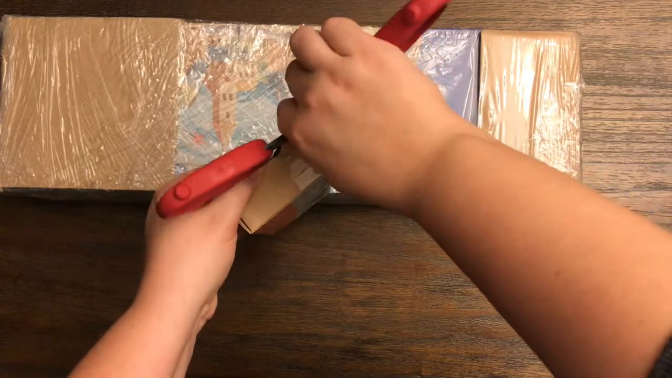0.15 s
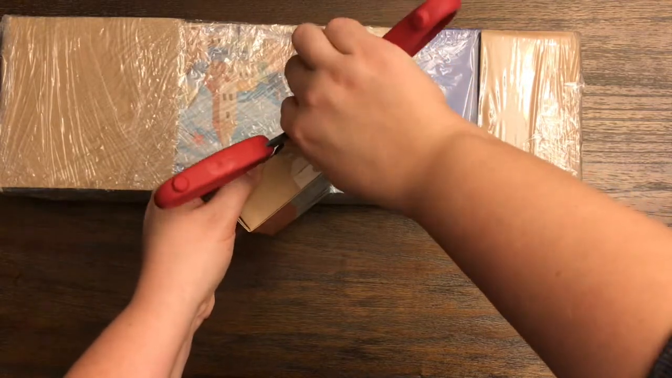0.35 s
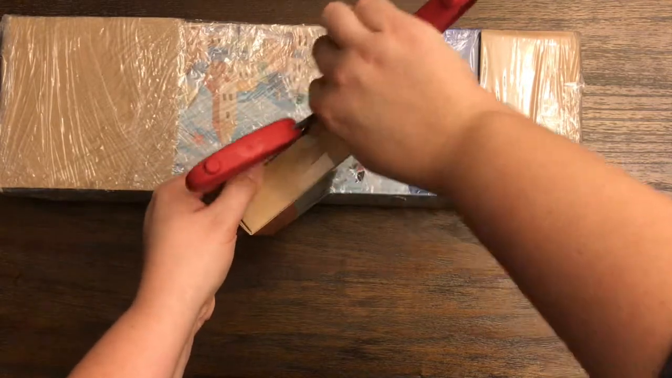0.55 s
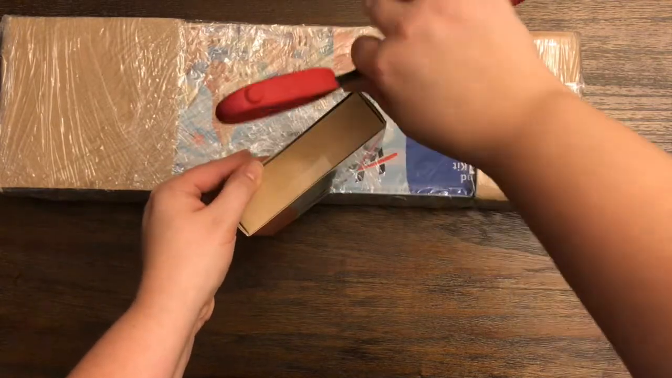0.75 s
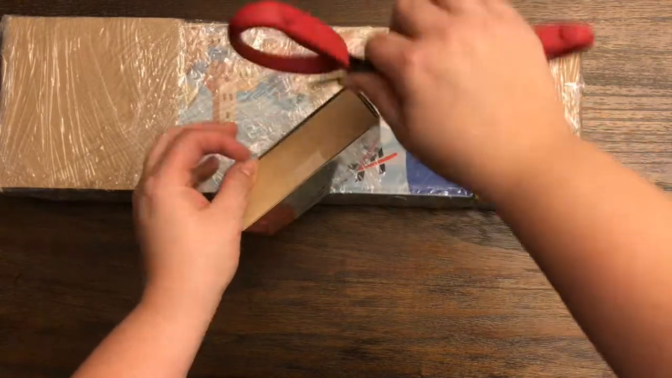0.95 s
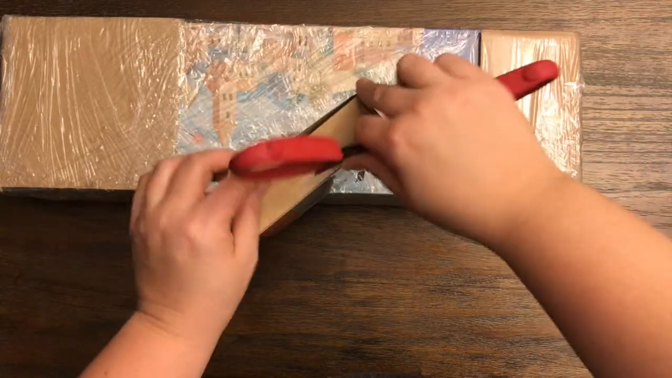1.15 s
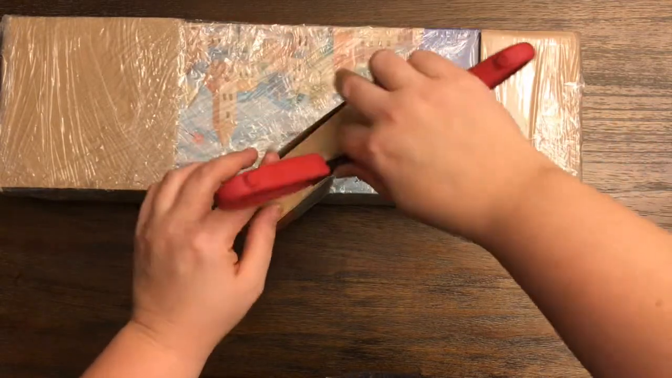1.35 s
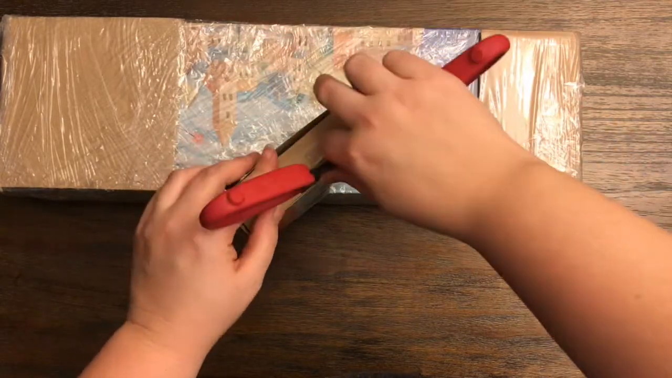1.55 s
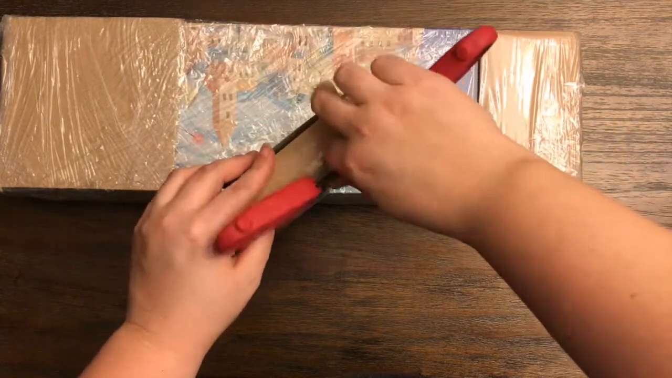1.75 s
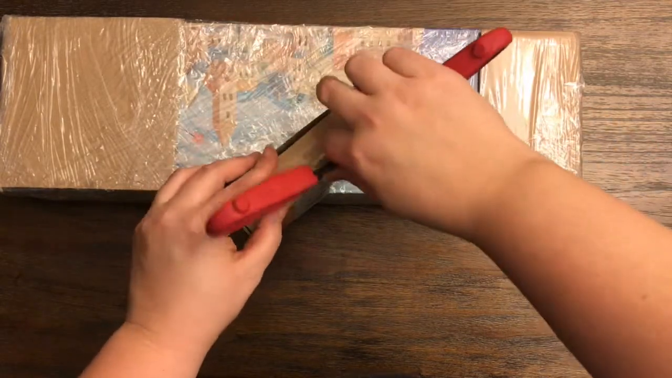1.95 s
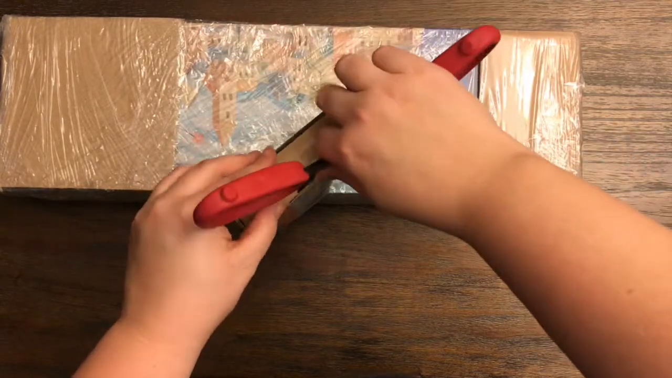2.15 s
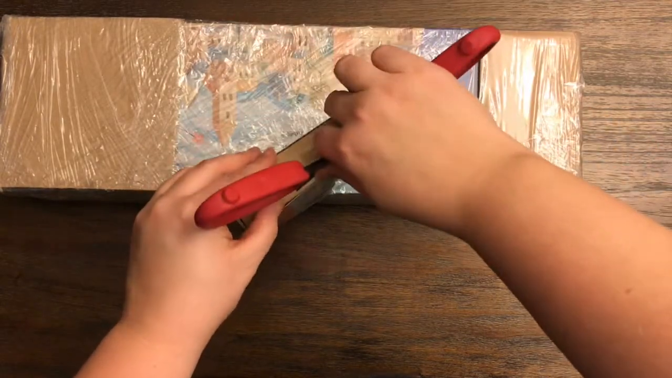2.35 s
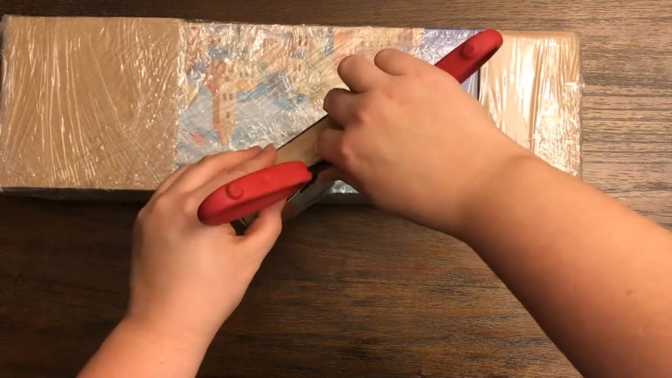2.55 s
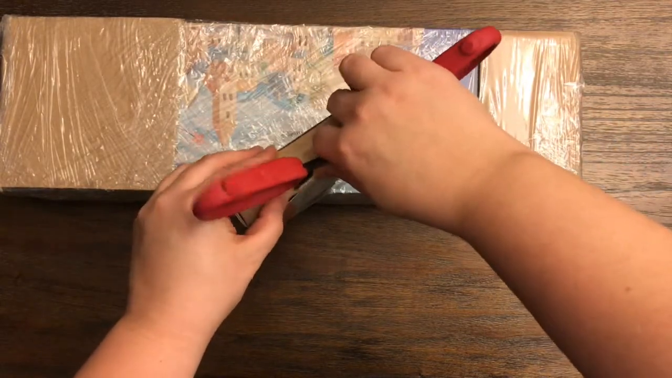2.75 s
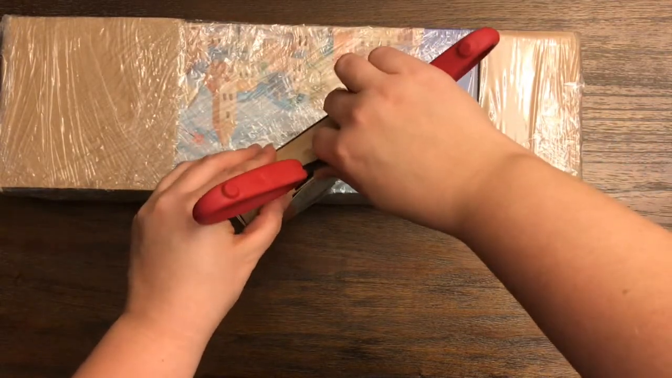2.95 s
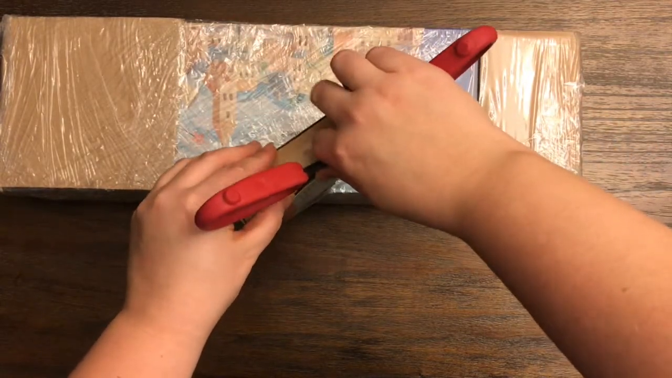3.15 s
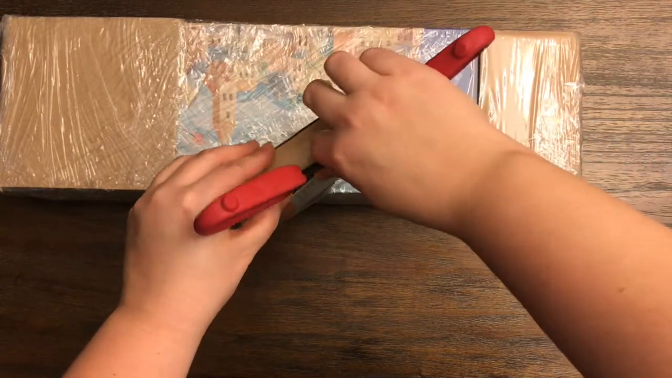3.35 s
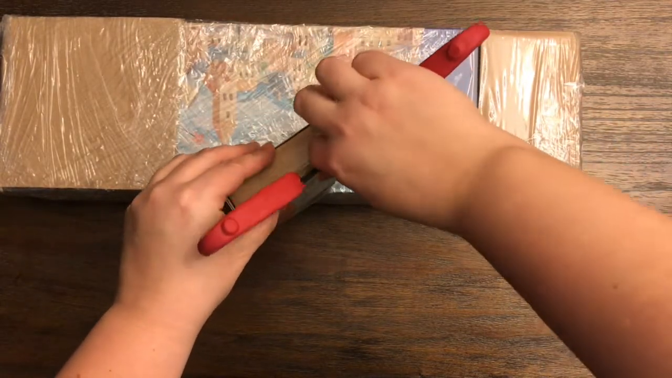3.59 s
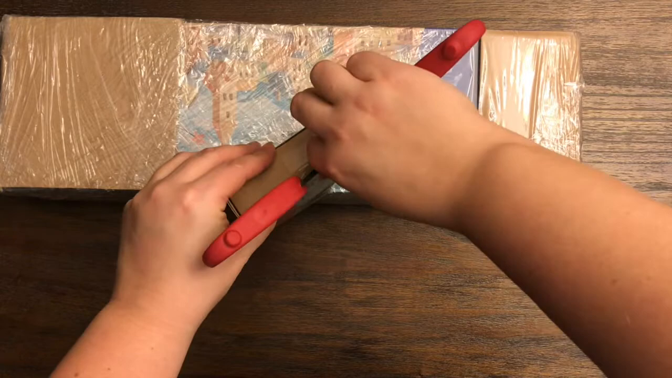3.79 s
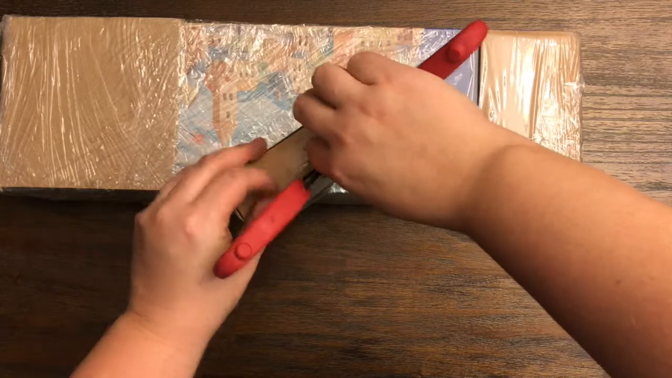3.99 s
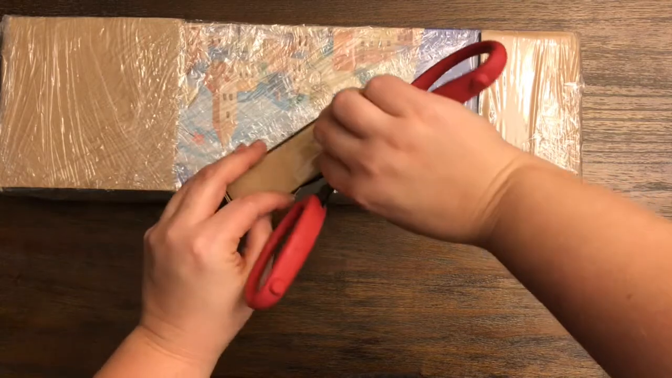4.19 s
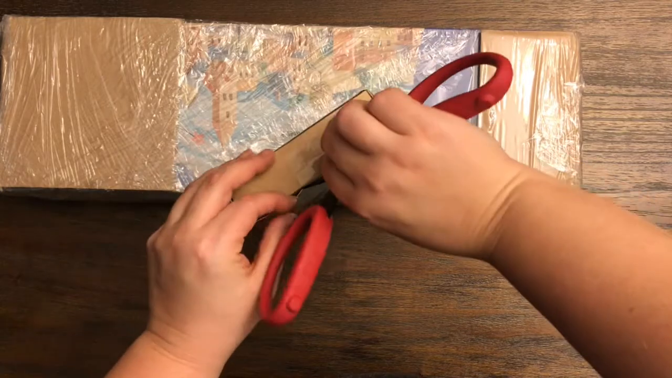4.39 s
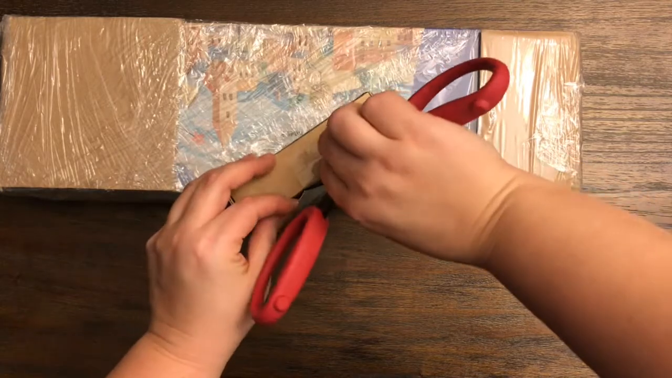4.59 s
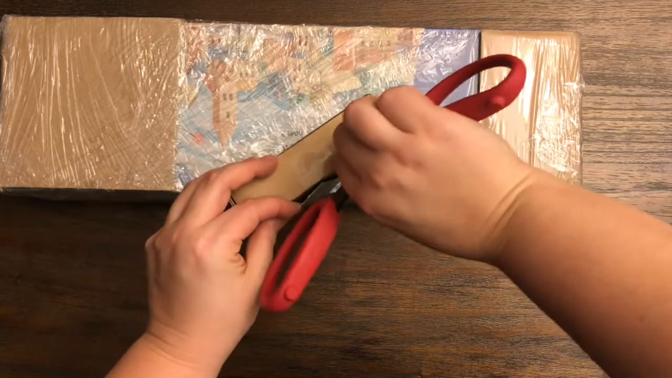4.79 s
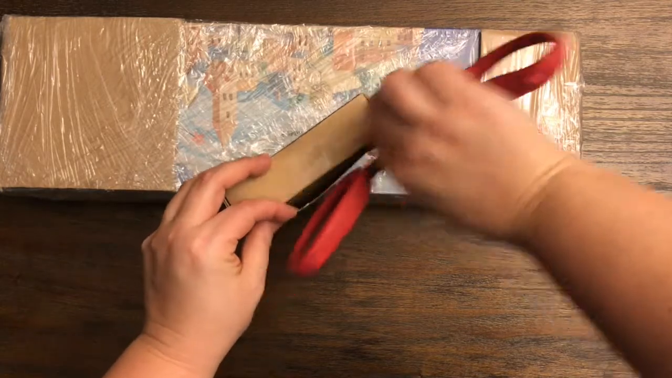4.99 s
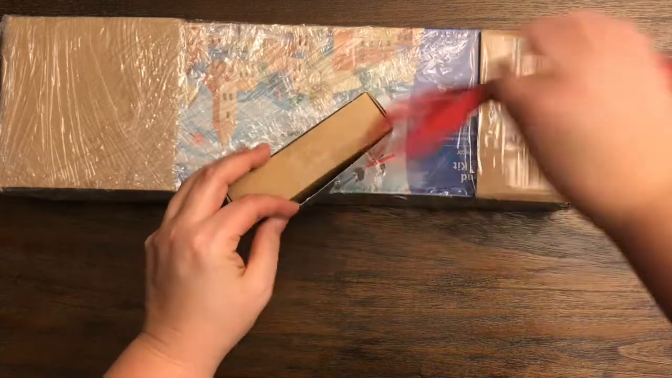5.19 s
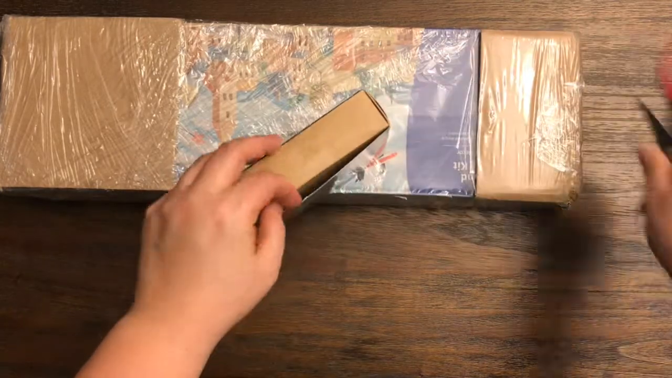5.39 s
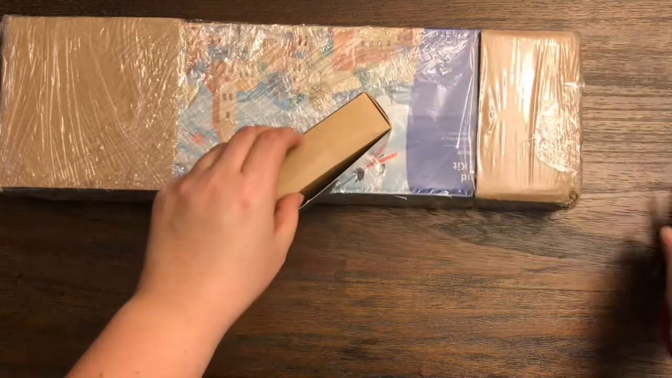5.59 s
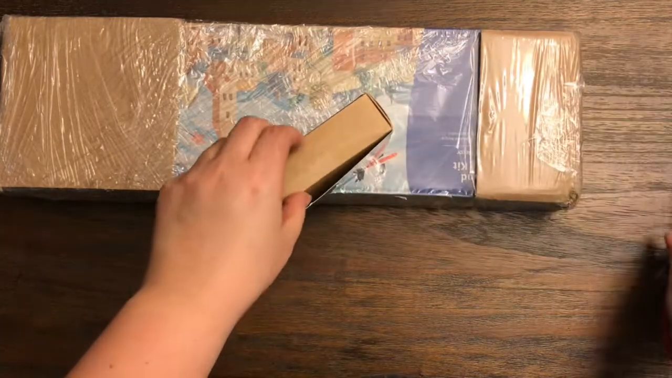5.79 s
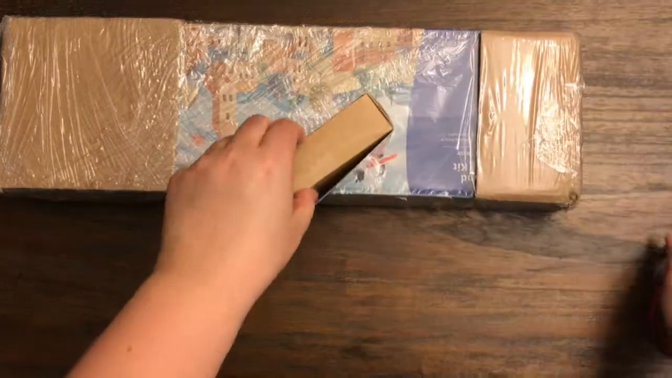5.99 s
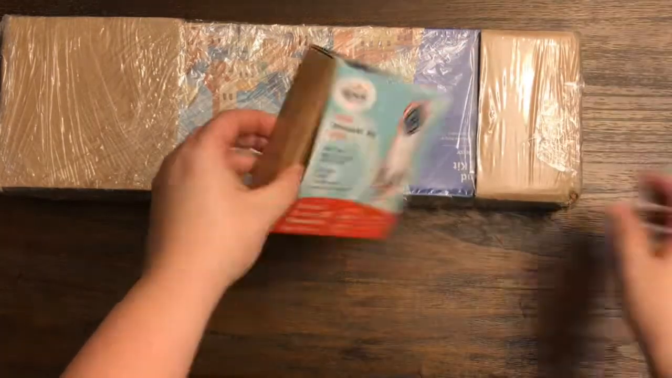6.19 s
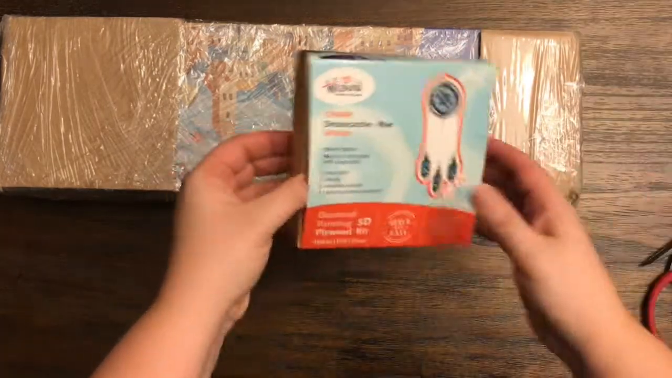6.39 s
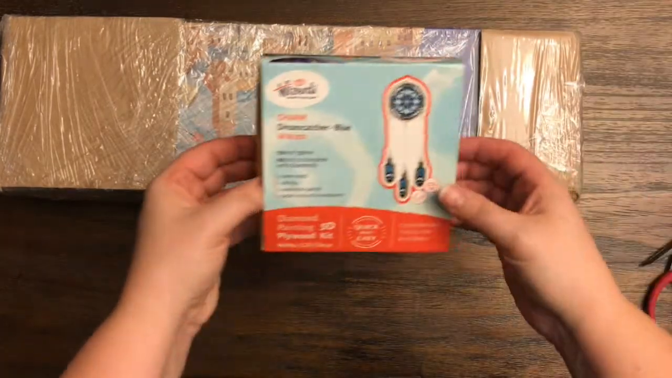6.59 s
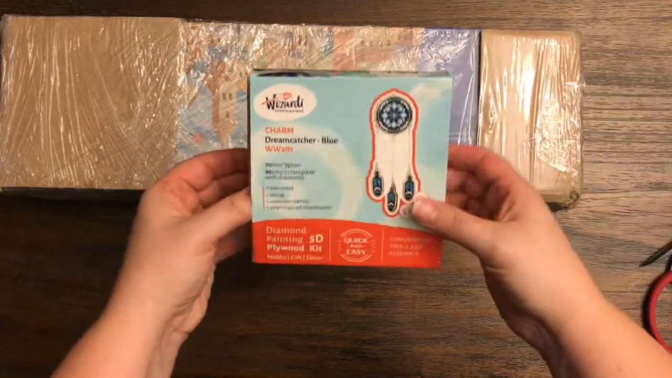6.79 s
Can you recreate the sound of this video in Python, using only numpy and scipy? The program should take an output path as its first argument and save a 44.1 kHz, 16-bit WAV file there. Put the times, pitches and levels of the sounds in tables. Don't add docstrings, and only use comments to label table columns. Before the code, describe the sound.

Scissors poke and slice tape on a small hollow cardboard box, with two sharp snaps, faint ticks, then a scraping, crinkling lift in a quiet room.

```python
import sys
import numpy as np
from scipy import signal
from scipy.fft import rfft, irfft, next_fast_len
from scipy.io import wavfile
from scipy.ndimage import uniform_filter1d

SR = 44100
rng = np.random.default_rng(int(sys.argv[2]) if len(sys.argv) > 2 else 0)


def master(y):
    cut = np.clip(np.atleast_2d(y).T, -1, 1)
    pcm = np.round(cut * 32767)
    wavfile.write(sys.argv[1], SR, pcm.astype(np.int16))


def attenuation_scalar(level_db):
    decades = np.asarray(level_db, float) / 20
    return 10 ** decades


N = 301672

# f/Hz, density [dB per Hz]
ROOM_AIR = [(25, -100), (45, -90), (110, -85), (170, -87), (300, -91), (400, -91), (500, -100),
            (800, -102.5), (1100, -105), (1600, -106), (2100, -110), (3200, -112.5), (5000, -115.5),
            (10500, -120), (15500, -120)]
# multiple of the hum pitch, level/dB rms
HUM_OVERTONES = [(1, -61.5), (2, -67), (3, -78)]
# t/s, crack peak level/dB, crack centre f/Hz
POPS = [(.045, -60, 7000), (0.081, -53, 6560), (.166, -48, 9100), (0.1884, -52, 9000), (0.359, -56.5, 6560),
        (.468, -14.5, 10300), (1.0083, -44, 13400), (1.023, -39, 8520), (1.039, -33, 9000),
        (2.3605, -38, 9000), (2.3663, -32.5, 8600), (2.3731, -30.5, 7000), (2.755, -50, 13800),
        (2.822, -42, 8450), (3.0552, -49.5, 6850), (4.136, -57, 11000), (4.0135, -43, 7500),
        (4.2174, -48, 9000), (4.9879, -16, 12500), (5.4155, -39, 7340), (6.769, -43.5, 5660)]
# t/s, crack peak level/dB
TICKS = [(0.7863, -42), (0.8766, -52), (0.9875, -44.5), (1.0617, -53), (1.29, -41.5), (1.7926, -49),
         (1.842, -47), (1.991, -62), (2.111, -59), (2.24, -55), (2.5305, -59), (2.5365, -53.5),
         (2.624, -45), (2.7177, -60), (3.1052, -51), (3.541, -56), (3.657, -57), (4.0461, -43),
         (4.072, -56), (4.1883, -46), (4.763, -48), (4.875, -52), (5.0404, -34), (5.2236, -50),
         (5.8444, -57), (6.2872, -66), (6.418, -56), (6.596, -54)]
# t/s, crack peak level/dB, box low level/dB, box mid level/dB, panel f/Hz
SNAPS = [(0.4601, -45, -52, -48, 203), (0.4645, -22.5, -34, -30.5, 160), (.468, -35, -54, -23, 294),
         (0.4694, -17, -29, -32, 178.6), (0.5071, -38, -34.5, -45, 186), (0.6844, -26, -29.5, -31.5, 560),
         (0.6914, -24, -30, -65, 820), (4.961, -43.5, -54, -65, 171), (4.9893, -22.5, -32.5, -24.5, 517),
         (5.005, -35, -52, -56, 374), (5.02, -22, -22.5, -27.5, 704), (5.697, -56, -42, -39, 221),
         (5.7057, -50, -42, -52, 206), (5.92, -26.5, -32, -32.5, 200), (5.9938, -48, -43, -26, 799),
         (6.0161, -36, -23.5, -21.5, 805), (.476, -60, -30.5, -65, 181), (0.489, -48, -42.5, -64, 165),
         (4.761, -72, -46, -73, 212), (4.994, -63, -32, -52, 225)]
# t/s, crack peak level/dB, box low level/dB, box mid level/dB, panel f/Hz
KNOCKS = [(1.4604, -59, -56, -50, 336), (1.7255, -35, -47, -49.5, 795), (1.7273, -39.5, -50, -55, 800),
          (1.7788, -60, -43, -45, 171), (2.226, -40, -41, -55, 550), (2.575, -38, -40.5, -46.5, 310),
          (2.646, -49, -64, -49, 285), (2.651, -60, -58, -49, 358), (2.821, -63, -48, -71, 183),
          (2.9504, -55.5, -49, -71, 160), (3.0564, -60, -46, -54, 410), (3.204, -49, -34, -64, 296),
          (3.3905, -57.5, -86, -55, 187), (3.4382, -49.5, -52, -49, 474), (3.46, -48, -46, -57, 550),
          (3.8717, -45, -52, -40.5, 291), (4.2177, -60, -48, -49, 477), (4.2709, -62, -48.5, -49.5, 353),
          (4.33, -47.5, -46.5, -49, 333), (4.7902, -65, -43.5, -49, 295), (5.4276, -42.5, -61, -55, 404),
          (6.4506, -42.5, -41, -77, 710), (6.6504, -53.5, -59, -51, 337), (6.772, -63, -49.5, -48, 625),
          (6.7985, -50, -56, -42.5, 330)]
# t/s, crack peak level/dB, crack centre f/Hz, box level/dB
CRINKLES = [(5.9306, -47, 6010, -38.5), (5.9402, -34, 5400, -36), (5.9538, -36, 5960, -38),
            (5.999, -32.5, 6000, -33), (6.02, -48, 6700, -50), (6.027, -26.5, 6450, -22),
            (6.0354, -43, 5800, -33), (6.063, -44, 8000, -39), (6.071, -41, 6410, -40),
            (6.084, -39, 9000, -40), (6.089, -25.5, 11600, -32), (6.0984, -44, 4200, -49),
            (6.1048, -37, 9000, -40), (6.1183, -44, 11000, -41), (6.131, -39, 5000, -32.5),
            (6.1347, -34, 12800, -41), (6.1675, -59, 6170, -42), (6.2017, -52, 4500, -32.5)]
# f/Hz, width f/Hz, level/dB
BOX_LOW = [(134, 32, -6), (216, 35, -7), (291, 56, -3), (436, 60, -8), (553, 80, -13), (715, 110, -18)]
# f/Hz, width f/Hz, level/dB
BOX_MID = [(847, 170, 1), (1242, 200, 2), (1500, 260, 0), (1950, 300, -1), (2350, 350, -4), (2950, 400, -7)]
# t/s, length t/s, low level in/dB, low level out/dB, mid minus low/dB
DRAGS = [(.471, 0.011, -44, -46, -10), (.487, 0.22, -51, -70.5, -3), (.687, 0.052, -43.5, -63, 11.5),
         (4.758, 0.069, -44, -60.5, -8), (4.958, 0.023, -56.5, -47, 0), (5.024, 0.027, -40, -57, 4),
         (5.06, 0.081, -58, -61, 12), (5.7, 0.069, -51, -66.5, 6), (5.92, 0.06, -39.5, -51.5, 10)]
# t/s, length t/s, low level in/dB, low level out/dB, mid minus low/dB
NUDGES = [(2.222, .05, -63, -71, 3), (2.544, 0.024, -65, -60, -9), (2.574, 0.021, -49.5, -66, -14),
          (2.643, 0.049, -61, -72, 10), (2.797, 0.036, -62, -61.5, -13), (2.889, 0.12, -70.5, -74, 4),
          (3.178, 0.025, -66, -54, 1), (3.205, 0.087, -58.5, -72, -4), (3.446, 0.021, -64, -64, 9.5),
          (5.213, 0.012, -49, -72, -7), (5.423, 0.08, -58, -69.5, 4), (6.451, 0.13, -63.5, -70, 9.5)]
# t/s, length t/s, level
# in/dB, level out/dB, brightness/dB
RUBS = [(.472, 0.015, -34, -71, 8), (.503, 0.015, -51, -41.5, -3), (.54, 0.17, -60.5, -54.5, -1),
        (.689, 0.0069, -39, -36, 3), (.7, 0.059, -33.5, -64, -2), (.745, .16, -52.5, -61, -6.5),
        (.977, 0.15, -56, -72, 2.5), (1.188, 0.048, -67, -55, -2.5), (1.232, 0.055, -59.5, -55, 7),
        (1.28, 0.079, -50.5, -56.5, 1.5), (1.345, 0.063, -51, -77, -2), (1.46, 0.31, -58, -74, -38),
        (1.774, 0.022, -59, -60.5, 3), (1.842, 0.015, -52, -61, -10), (2.328, 0.032, -65, -55, 3),
        (2.376, 0.054, -65, -75, 6), (2.644, .006, -49, -56, -12), (2.652, .008, -46, -51, -10),
        (2.662, 0.05, -56, -66, -12), (3.43, 0.035, -64, -59, -3), (3.972, 0.014, -57, -66, 7),
        (3.99, 0.15, -61.5, -65, 0), (4.185, .025, -60, -58, -5), (4.211, 0.015, -56, -55, 2.5),
        (4.23, 0.054, -58, -53.5, -6), (4.295, 0.2, -59.5, -68.5, -9), (3.875, 0.024, -67, -72, -20),
        (4.751, 0.055, -59.5, -57, 4.5), (4.951, 0.025, -58, -48, 0), (4.989, 0.0021, -36, -66, 6),
          (5.002, 0.015, -37, -57, 1), (5.02, 0.13, -41, -49, -3), (5.161, 0.53, -59.5, -60.5, -2.5),
          (5.697, 0.2, -66, -59.5, -13), (5.916, 0.066, -28, -50, -34), (5.998, .016, -64, -71, -15),
          (6.02, 0.021, -28, -67, 4.5), (6.066, 0.1, -67, -81, -6), (6.441, 0.17, -55.5, -65, -8),
          (6.76, 0.084, -55, -62, -7)]
# f/Hz, density [dB per Hz]
CARD = [(1200, 1), (2000, 1), (2900, 0.5), (3600, 0), (5400, -4.5), (8000, -17.5), (11900, -15),
        (15700, -20)]
# t/s, level/dB, f/Hz
SEAM_GLIDES = [
    [(5.06, -66, 2800), (5.1, -55, 2920), (5.13, -53, 2950), (5.141, -46, 3150), (5.146, -84, 3150)],
    [(2.624, -70, 4200), (2.634, -67, 4300), (2.64, -80, 4300)],
    [(1.46, -65, 2840), (1.49, -73, 2670), (1.54, -85, 2460)],
    [(2.644, -60, 4270), (2.657, -60, 4320), (2.663, -77, 4300), (2.72, -78, 4300)],
]
# t/s, peak level/dB
RINGS = [
    (4.989, -29.5),
    (5.004, -45),
    (5.0191, -30.5),
]
# t/s, level/dB, upper modes level/dB
LIFT = [(5.992, -51, -6), (5.998, -38.5, 6.5), (6.01, -39, 0), (6.02, -32, -1.5), (6.052, -35.5, -3.5),
        (6.092, -36.5, -5.5), (6.128, -43.5, -4.5), (6.132, -38.5, -2), (6.186, -45, -9.5),
        (6.206, -42.5, -9.5), (6.25, -45, -14.5), (6.275, -54, -10.5), (6.31, -56, -4.5)]
# f/Hz, width f/Hz, level/dB
BOARD_LOW = [(136, 37, -5.5), (212, 75, -6), (283, 50, 2), (416, 100, -9)]
# f/Hz, width f/Hz, level/dB
BOARD_HIGH = [(670, 60, 4.5), (858, 77, 2), (1213, 60, -1.5), (1540, 165, -3), (1860, 150, -9),
              (2110, 280, -10), (2650, 170, -22)]
# f/Hz, level/dB
MIC_PORT = [(2000, 2), (4300, 0), (5000, -2.5), (6200, 0), (9600, -0.5), (10500, -5), (11500, -2.5)]

HUM_HZ = 58.5
BUZZ_DB, BUZZ_HZ = -67.5, 11400
BLADE_HZ, BLADE_SPREAD = 4080, 0.028
POP_LOW_DB, POP_MID_DB, TICK_LOW_DB, TICK_MID_DB = -27, -20, -30, -5
WIDE_PANEL_HZ, BASE_PANEL_HZ, WRAP_MID_DB = 200, 285, -7
LOW_LATE_S = 0.002127
ATTACK_S, RELEASE_DB_PER_S = 0.002, 900
RING_HZ, RING_T60_S = 3243, 0.018
NEAR_LOW_HZ = 42.5
ECHO_DB, ECHO_T60_S = -17, 0.25
TOP_HZ, LEAK_DB = 16000, -31
HIT_T = np.arange(4096) / SR
HIT_TAIL = np.exp(-HIT_T / 0.0091)


def unit(x):
    return x / np.sqrt(np.mean(x ** 2) + 1e-30)


def colour(x, gain):
    n = next_fast_len(len(x))
    f = np.arange(1, n // 2 + 2) * SR / n
    return irfft(rfft(x, n) * gain(f), n)[:len(x)]


def points(table):
    hz, db = np.transpose(table)
    return lambda f: attenuation_scalar(np.interp(np.log(f), np.log(hz), db))


def modes(table, detune=0.99, spread_db=0.):
    hz, width, db = np.transpose(table)[:, :, None]
    hz = hz * detune
    sign = (-1) ** np.arange(len(table))[:, None]
    gain = attenuation_scalar(db + spread_db) * sign
    return lambda f: np.sum(gain * 1j * f * width / (hz ** 2 - f ** 2 + 1j * f * width), axis=0)


def walk(rate):
    k = int(SR / rate)
    held = np.repeat(rng.standard_normal(N // k + 1), k)
    return unit(uniform_filter1d(held, k)[:N])


def curves(tables):
    t, gain, second = np.arange(N) / SR, np.zeros(N), np.zeros(N)
    for s, db, other in map(np.transpose, tables):
        on = (t >= s[0]) & (t <= s[-1])
        gain[on] = attenuation_scalar(np.interp(t[on], s, db))
        second[on] = np.interp(t[on], s, other)
    return uniform_filter1d(gain, 88), second


def strokes(rows):
    gain, second = np.zeros(N), np.zeros(N)
    for s, length, in_db, out_db, other in rows:
        span = slice(int(s * SR), min(int((s + length) * SR) + SR // 10, N))
        t = np.arange(span.stop - span.start) / SR
        slope_db = np.interp(t, [0, length], [in_db, out_db])
        slope_db = slope_db - RELEASE_DB_PER_S * np.maximum(t - length, 0)
        now = attenuation_scalar(slope_db) * np.minimum(t / ATTACK_S, 1)
        second[span] = np.where(now > gain[span], other, second[span])
        gain[span] = np.maximum(now, gain[span])
    return gain, second


def grit(rough_db, flicker_db, rate):
    slips = np.minimum(rng.exponential(size=N), 4)
    level_db = rough_db * slips + flicker_db * walk(rate)
    return unit(rng.standard_normal(N) * attenuation_scalar(level_db))


def room_tone():
    phase = 2 * np.pi * np.cumsum(HUM_HZ * (1 + 0.002 * walk(2.89))) / SR
    hum = np.zeros(N)
    for k, db in HUM_OVERTONES:
        hum += np.sqrt(2) * attenuation_scalar(db + 0.83 * k * walk(8.3)) * np.sin(k * phase + k)
    flutter_db = 1.5 * np.sin(phase) + 5.0 * np.sin(2 * phase) + 2.5 * walk(160) + walk(25)
    buzz = colour(attenuation_scalar(flutter_db) * rng.standard_normal(N),
                  lambda f: (f / BUZZ_HZ) / (1 + (BUZZ_HZ / f) ** 16))
    air = colour(rng.standard_normal(N) * attenuation_scalar(0.6 * walk(2.2) - 0.7), points(ROOM_AIR))
    return hum + attenuation_scalar(BUZZ_DB) * unit(buzz) + np.sqrt(SR / 2) * air


def contacts():
    def blade_hz():
        return BLADE_HZ * (1 + BLADE_SPREAD * rng.standard_normal())

    clicks = []
    for s, db, low, mid, panel in SNAPS + KNOCKS:
        clicks.append((s, db, blade_hz(), low, mid, panel))
    for s, db, hz, box in CRINKLES:
        clicks.append((s, db, hz, box, box + WRAP_MID_DB, BASE_PANEL_HZ))
    for s, db in TICKS:
        clicks.append((s, db, blade_hz(), db + TICK_LOW_DB, db + TICK_MID_DB, WIDE_PANEL_HZ))
    for s, db, hz in POPS:
        clicks.append((s, db, hz, db + POP_LOW_DB, db + POP_MID_DB, WIDE_PANEL_HZ))
    return clicks


def crack(hz):
    burst = (1 - np.exp(-HIT_T / .0004)) * (np.exp(-HIT_T / .0008) + .07 * HIT_TAIL)
    peak, broad = modes([(hz, .4 * hz, 0)]), modes([(hz, 3.5 * hz, -8)])
    return colour(rng.standard_normal(len(HIT_T)) * burst,
                  lambda f: peak(f) + broad(f) * (f / (f + 0.14 * hz)) ** 2)


def box_thud(panel_hz):
    nearness_db = -15 * np.abs(np.log2(np.array(BOX_LOW)[:, :1] / panel_hz))
    bounce = 1 + uniform_filter1d(rng.standard_normal(len(HIT_T)), size=16)
    push = HIT_T * np.exp(-4. * panel_hz * HIT_T) * bounce
    ring = modes(BOX_LOW, 1 + 0.17 * rng.standard_normal((6, 1)), nearness_db)
    panel = modes([(1.4 * panel_hz, 1.5 * panel_hz, -8)])
    thud = colour(push, lambda f: ring(f) + panel(f))
    return np.roll(thud, int(LOW_LATE_S * SR))


def box_knock():
    burst = (1 - np.exp(-HIT_T / 0.00016)) * (np.exp(-HIT_T / 0.00052) + 0.12 * HIT_TAIL)
    noise = uniform_filter1d(rng.standard_normal(len(HIT_T)), size=6)
    detune, spread_db = 1 + 0.068 * rng.standard_normal((6, 1)), 6.2 * rng.standard_normal((6, 1))
    walls, broad = modes(BOX_MID, detune, spread_db), modes([(1100, 1500, -8)])
    return colour(noise * burst, lambda f: walls(f) + broad(f))


def hits():
    out = np.zeros(N + len(HIT_T))
    for s, crack_db, hz, low_db, mid_db, panel_hz in contacts():
        i = int(s * SR)
        parts = ((crack(hz), crack_db + 0.5), (box_thud(panel_hz), low_db + 2.5), (box_knock(), mid_db - 1.5))
        for part, db in parts:
            out[i:i + len(HIT_T)] += attenuation_scalar(db) * part / np.max(np.abs(part))
    return out[:N]


def dragging():
    gain, mid_db = strokes(DRAGS + NUDGES)
    panels, air = modes(BOX_LOW), modes([(320, 400, -14)])
    low = colour(grit(rough_db=1.5, flicker_db=2.5, rate=70), lambda f: panels(f) + air(f))
    walls, broad = modes(BOX_MID), modes([(1600, 2500, 0)])
    mid = colour(grit(rough_db=1.5, flicker_db=3.0, rate=110), lambda f: walls(f) + 0.3 * broad(f))
    return gain * (attenuation_scalar(2.0) * unit(low) + attenuation_scalar(mid_db - 8.0) * unit(mid))


def rubbing():
    gain, bright_db = strokes(RUBS)
    force = colour(grit(rough_db=2.2, flicker_db=2.2, rate=200), points(CARD))
    hiss = np.zeros(N)
    for hz in 1400 * 1.35 ** np.arange(9):
        patch = colour(force, lambda f: np.exp(-(np.log(f / hz) / .2) ** 2))
        hiss += attenuation_scalar(3. * walk(45)) * patch
    dull = colour(hiss, lambda f: 1 / (1 + (f / 7000) ** 8))
    return gain * (attenuation_scalar(-9.5) * unit(dull) + attenuation_scalar(bright_db - 6.5) * unit(hiss - dull))


def slicing():
    gain, hz = curves(SEAM_GLIDES)
    swing = walk(1000) + 1j * walk(1000)
    return gain * np.real(swing * np.exp(2j * np.pi * np.cumsum(hz) / SR))


def blade():
    out = np.zeros(N)
    partials = np.sin(2 * np.pi * RING_HZ * HIT_T) + 0.3 * np.sin(2 * np.pi * 0.96 * RING_HZ * HIT_T)
    ring = np.exp(-np.log(1000) * HIT_T / RING_T60_S) * partials
    for s, db in RINGS:
        i = int(s * SR)
        out[i:i + len(HIT_T)] += attenuation_scalar(db) * ring
    return out


def board():
    gain, high_db = curves([LIFT])
    force = grit(rough_db=1.5, flicker_db=2.5, rate=90)
    low = colour(force, modes(BOARD_LOW))
    upper, broad = modes(BOARD_HIGH), modes([(1200, 2000, -16)])
    high = colour(force, lambda f: upper(f) + broad(f))
    return gain * (unit(low) + attenuation_scalar(high_db) * unit(high))


def room_echo(near):
    t = np.arange(SR // 2) / SR
    echo = rng.standard_normal(len(t)) * np.exp(-np.log(1000) * t / ECHO_T60_S) * (t > .003)
    echo = colour(echo, lambda f: 1 / (1 + 1j * f / 4000))
    return signal.fftconvolve(near, echo / np.sqrt(np.sum(echo ** 2)))[:N]


def scene():
    near = hits() + dragging() + rubbing() + slicing() + blade() + board()
    near = colour(near, lambda f: 1 / (1 - 1j * NEAR_LOW_HZ / f) ** 2)
    return (near + attenuation_scalar(ECHO_DB) * room_echo(near) + room_tone())[None]


def roll_off(x):
    return signal.sosfilt(signal.butter(12, 16820, fs=SR, output="sos"), x)


def record(dry):
    port = points(MIC_PORT)
    heard = colour(dry[0], lambda f: port(f) * np.where(f < TOP_HZ, 1, attenuation_scalar(LEAK_DB)))
    return roll_off(heard[None])


dry = scene()
out = record(dry)
master(out)
```